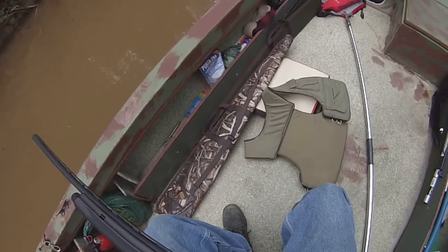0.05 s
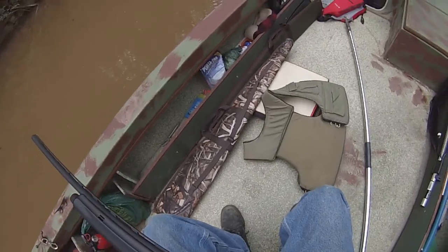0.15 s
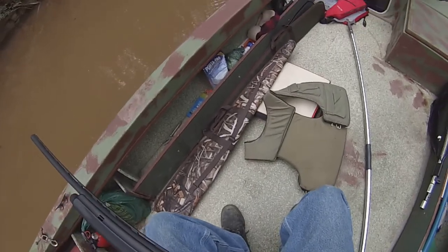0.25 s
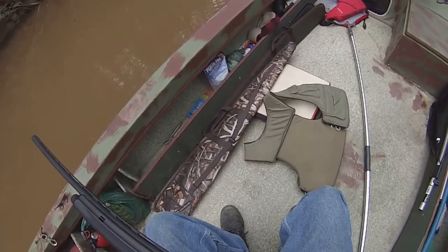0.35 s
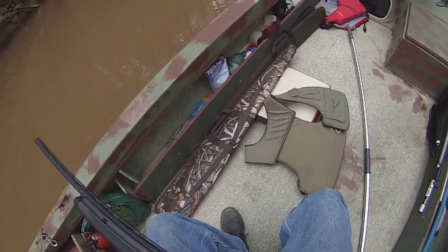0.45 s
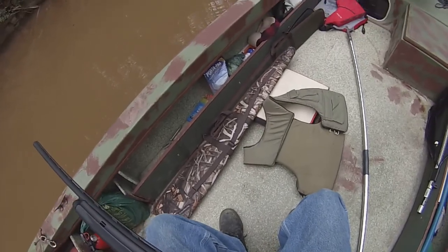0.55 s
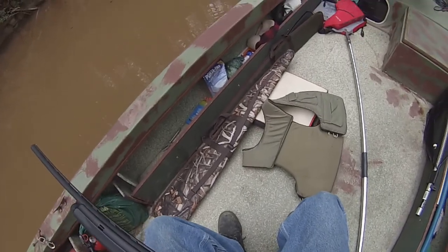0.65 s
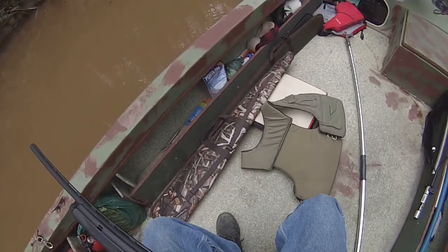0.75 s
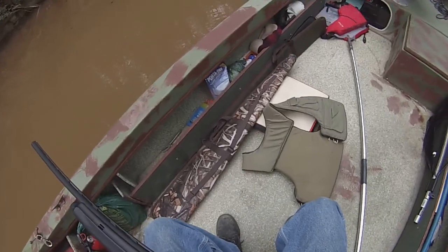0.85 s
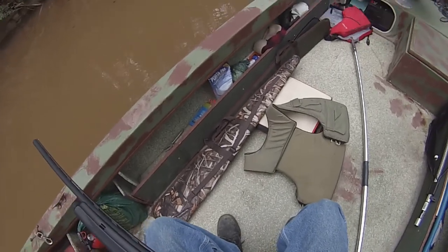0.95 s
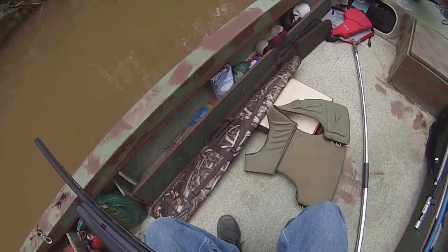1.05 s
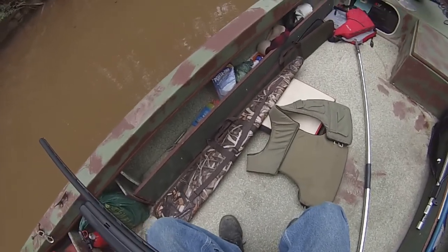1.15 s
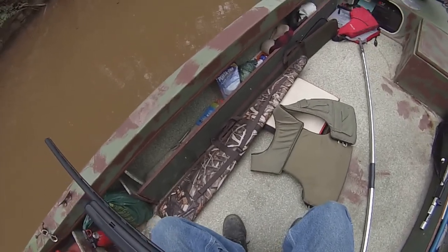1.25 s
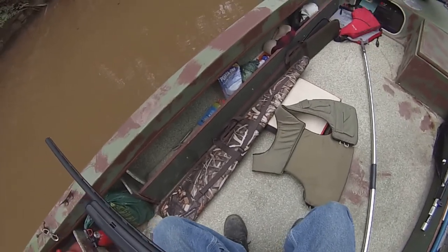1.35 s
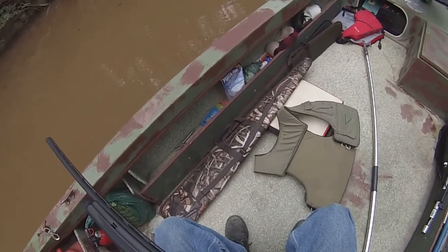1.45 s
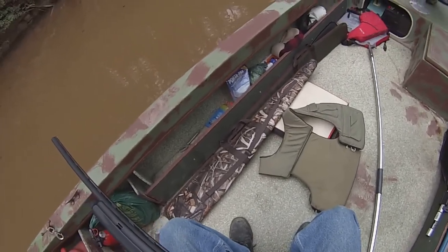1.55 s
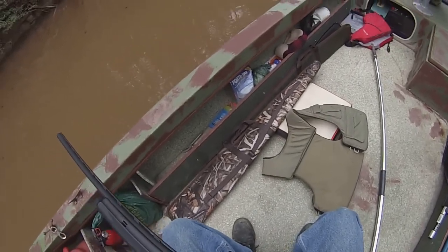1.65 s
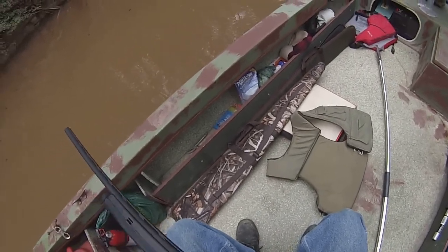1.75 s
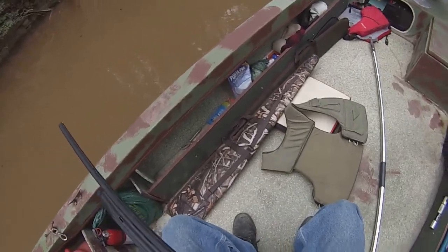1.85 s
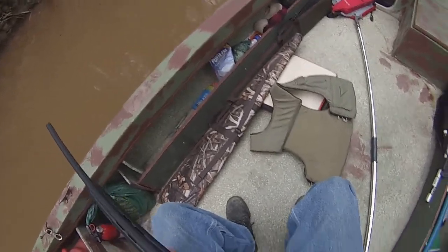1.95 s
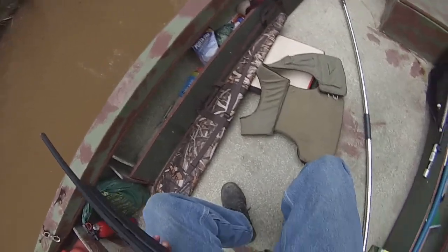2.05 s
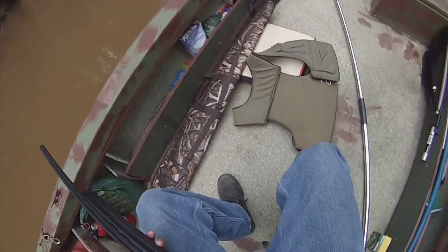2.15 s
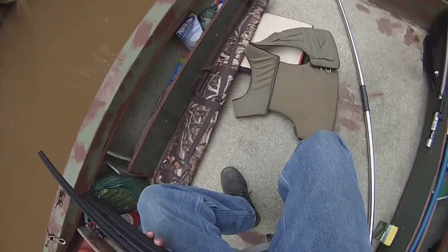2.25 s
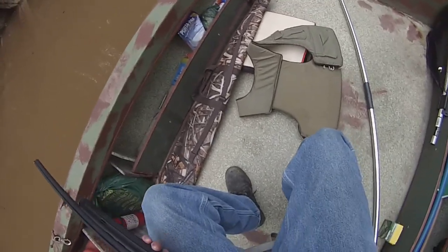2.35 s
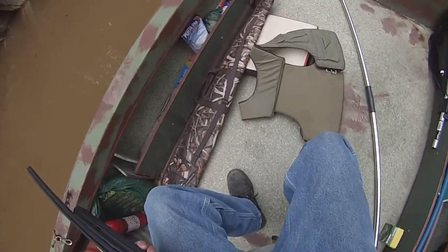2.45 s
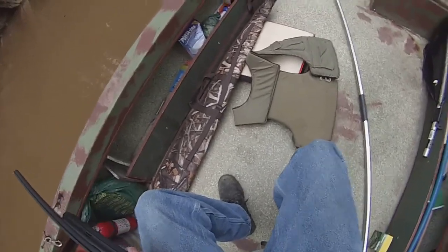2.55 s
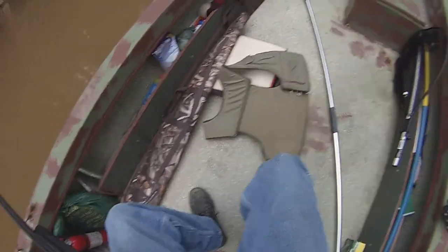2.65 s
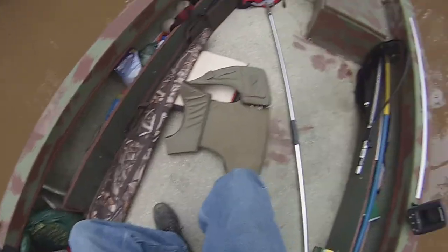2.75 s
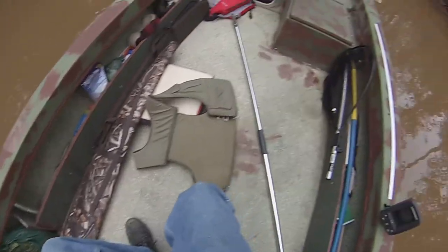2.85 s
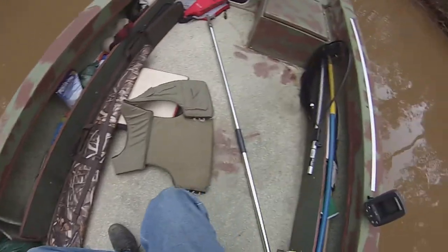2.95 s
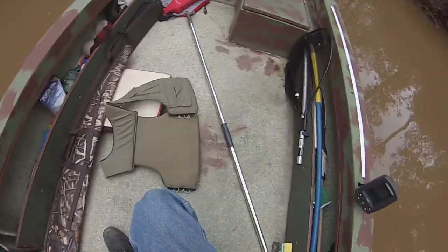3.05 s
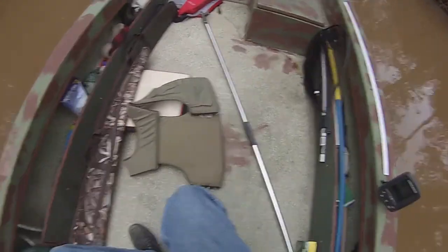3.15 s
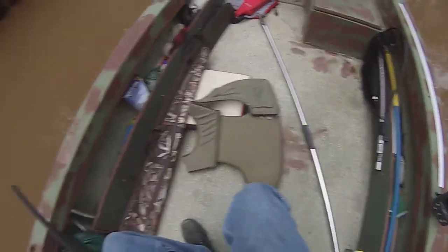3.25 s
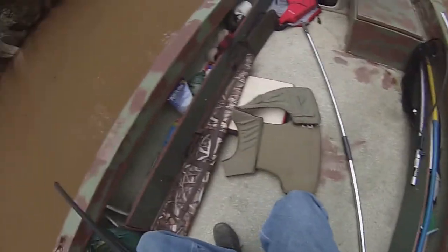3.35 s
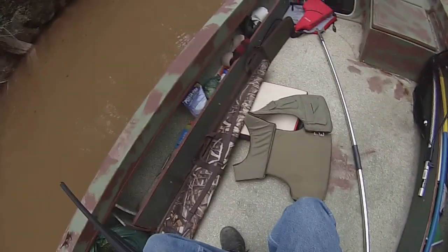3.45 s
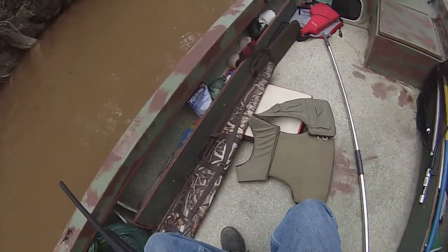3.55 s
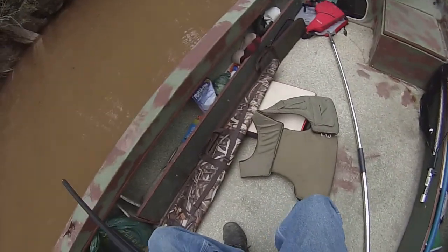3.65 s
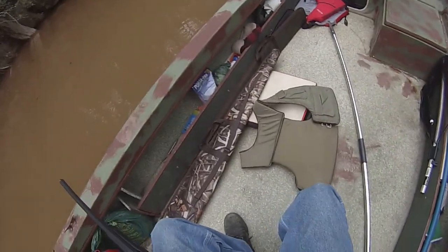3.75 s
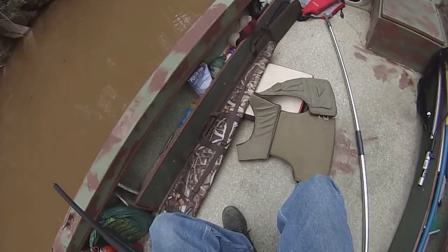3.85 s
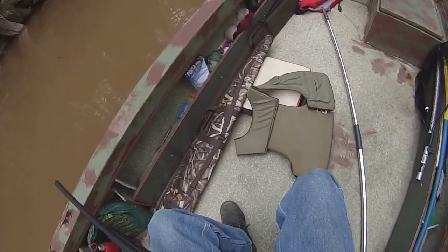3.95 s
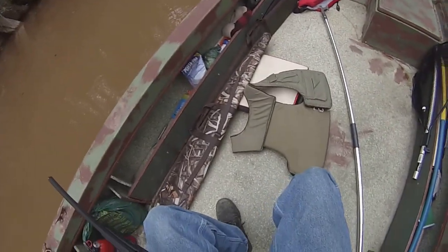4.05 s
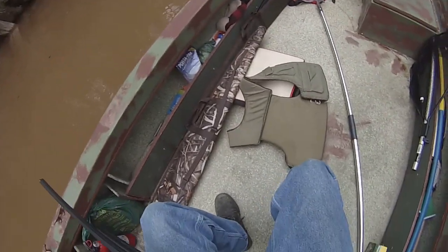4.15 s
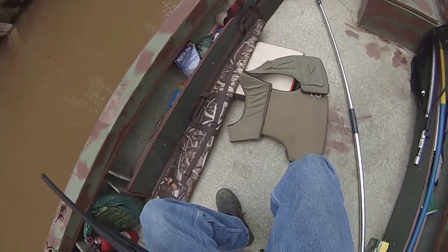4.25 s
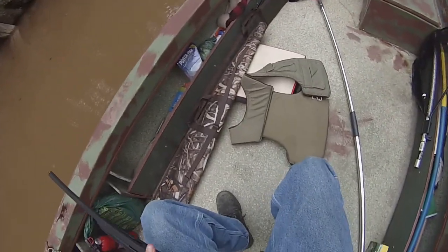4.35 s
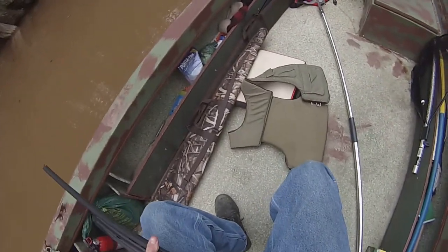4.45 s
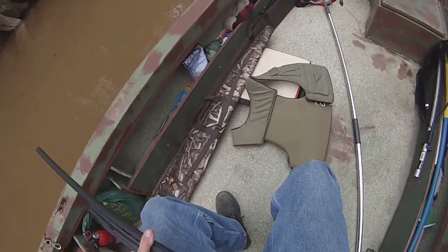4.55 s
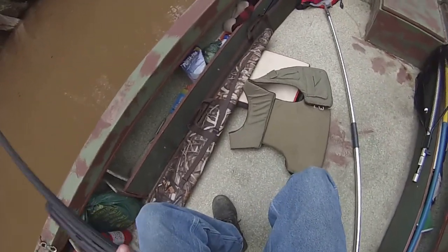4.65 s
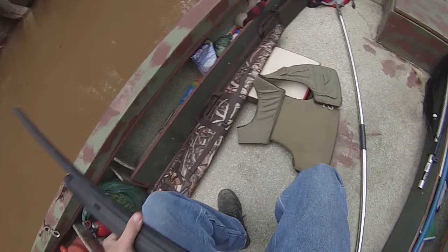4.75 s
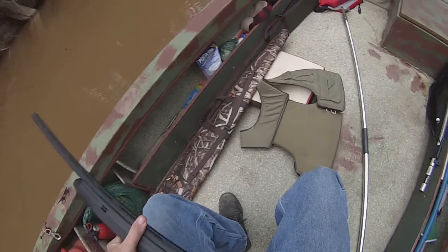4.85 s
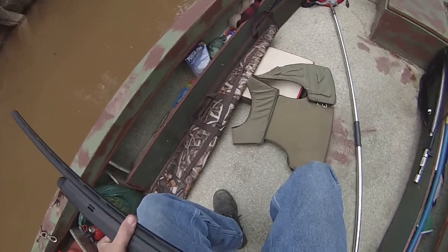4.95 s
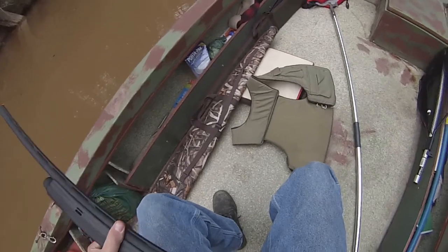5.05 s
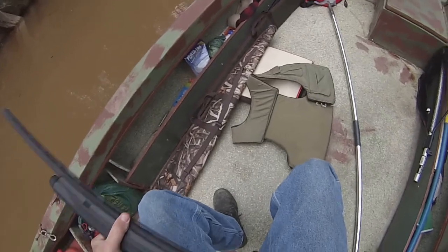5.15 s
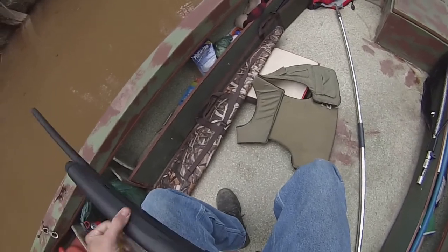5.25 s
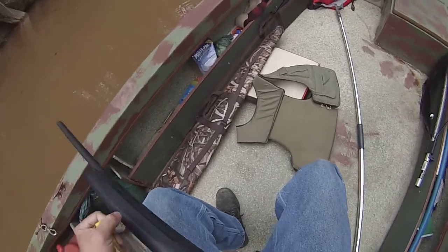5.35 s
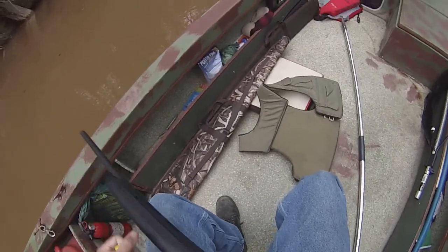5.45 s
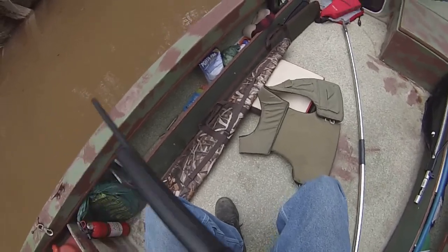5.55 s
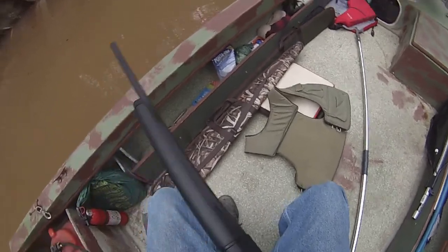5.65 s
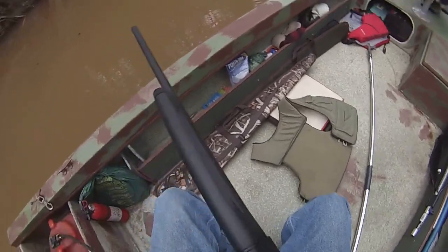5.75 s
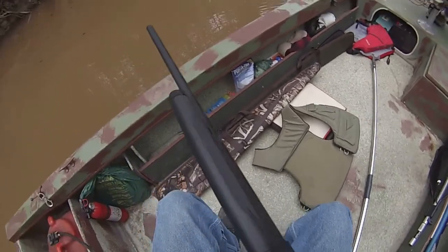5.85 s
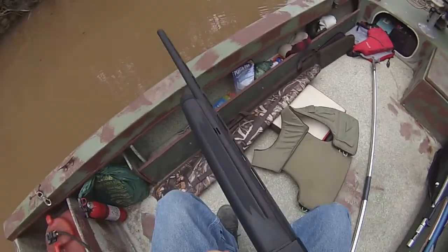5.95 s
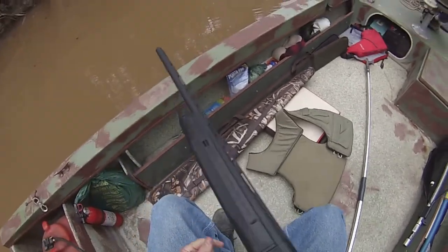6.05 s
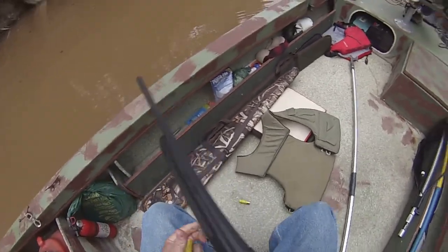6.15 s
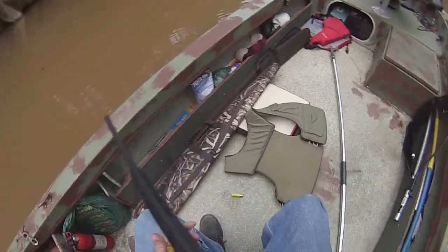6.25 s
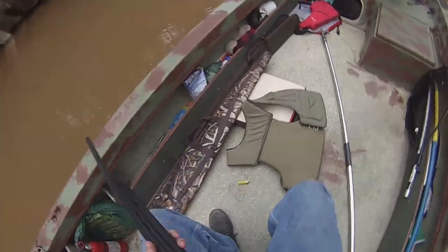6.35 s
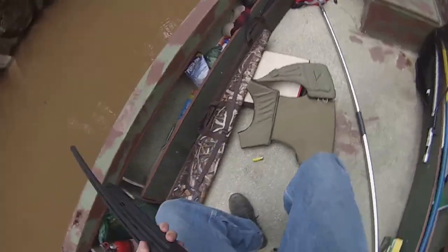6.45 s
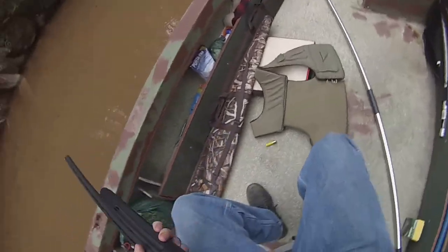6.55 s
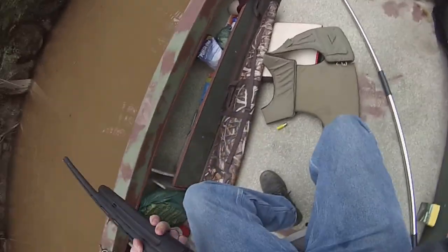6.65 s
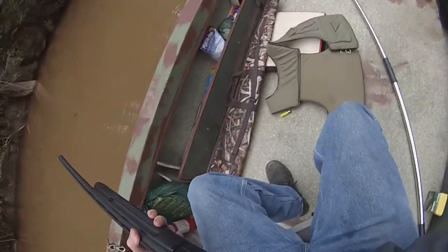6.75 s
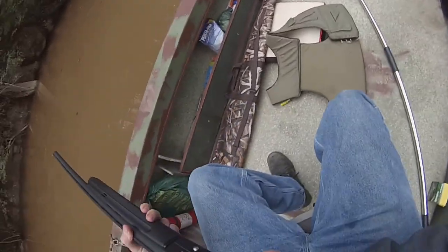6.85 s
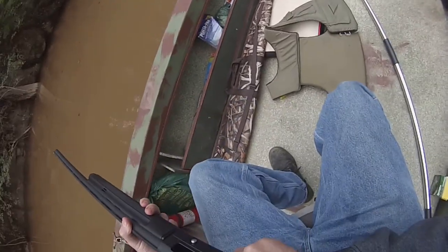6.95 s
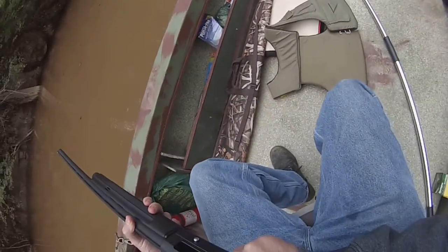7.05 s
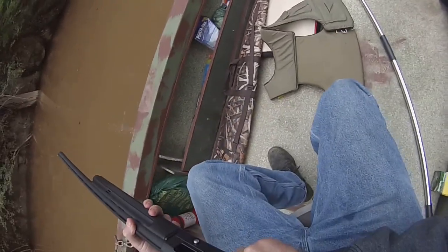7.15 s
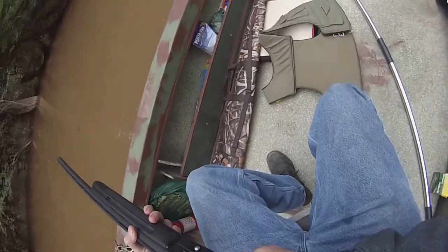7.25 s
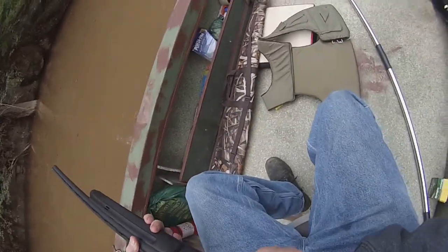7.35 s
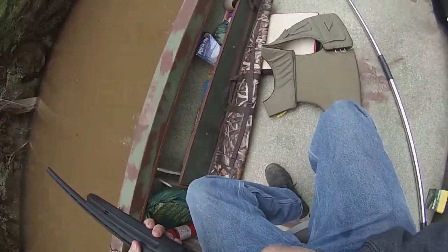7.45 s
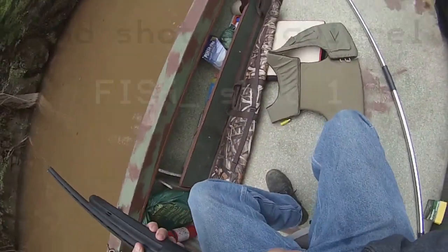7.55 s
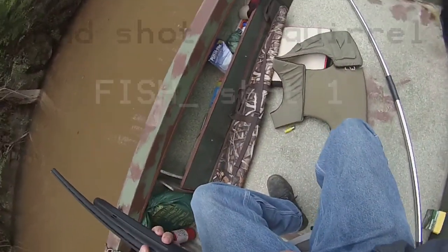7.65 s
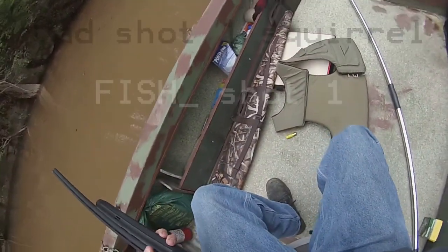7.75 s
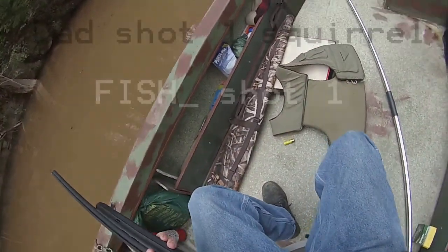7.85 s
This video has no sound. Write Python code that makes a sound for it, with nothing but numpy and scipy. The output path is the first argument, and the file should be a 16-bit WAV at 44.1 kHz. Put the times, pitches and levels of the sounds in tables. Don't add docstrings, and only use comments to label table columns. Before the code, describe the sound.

Close metallic clicks and hard racking clacks, quiet fumbling, then one loud hollow knock, a few bounces and gritty rolling on a boat floor.

```python
import sys
import numpy as np
from scipy import signal
from scipy.fft import rfft, irfft
from scipy.io import wavfile
from scipy.ndimage import uniform_filter1d

SR = 44100
rng = np.random.default_rng(int(sys.argv[2]) if len(sys.argv) > 2 else 0)


def ratio_of_db(decibels):
    return 10 ** (np.asarray(decibels, float) / 20)


def pcm_store(signal):
    levels = np.round(np.clip(np.atleast_2d(signal), -1, 1) * 32767)
    wavfile.write(sys.argv[1], SR, levels.astype(np.int16).T)


N = 347934
RING = 4096

# pitch_hz [Hz], level_db [dB], ring_s [s to fall 60 dB]
STEEL_MODES = [(1621, 19, 0.048), (1946, 10, 0.13), (2320, 6, 0.022), (2320, 4.5, 0.15), (2838, -7, 0.011),
               (3330, -19.5, .05), (4170, -4.5, 0.011), (4200, -14, 0.13), (5140, 3, 0.15),
               (5110, 1.5, 0.16), (6027, 3.5, 0.11), (6470, -12, .03)]
# pitch_hz [Hz], level_db [dB], ring_s [s to fall 60 dB]
STOCK_MODES = [(720, -5.5, 0.046), (800, 2.5, 0.013), (897, -8.5, 0.15), (1040, -5, 0.0062),
               (1140, 0.5, 0.024), (1356, 11, 0.017)]
# pitch_hz [Hz], level_db [dB], ring_s [s to fall 60 dB]
PLATE_MODES = [(200, 2, 0.66), (274, 2.5, 0.09), (314.5, -1.5, 0.033), (350, -5.5, 0.093), (411.8, 2, 0.09),
               (460, -1.5, 0.24), (561, -4.5, 0.15), (670.5, -21.5, 0.077)]


def colour(x, points):
    hz, db = np.transpose(points)
    size = x.shape[-1]
    bins = np.maximum(np.arange(size // 2 + 1) * SR / size, 1)
    gain = ratio_of_db(np.interp(np.log(bins), np.log(hz), db))
    y = irfft(rfft(x) * gain, size)
    return y / np.sqrt(np.mean(y ** 2))


def band(x, lo_hz, hi_hz):
    sos = signal.butter(2, [lo_hz, min(hi_hz, .45 * SR)], "bandpass", fs=SR, output="sos")
    return signal.sosfilt(sos, x)


def walk(rate):
    hold = int(SR / rate)
    steps = np.repeat(rng.standard_normal(N // hold + 1), hold)
    smooth = uniform_filter1d(uniform_filter1d(steps, hold), hold)[:N]
    return smooth / smooth.std()


def fade(t, t60):
    return np.exp(-np.log(1000) * t / t60)


def peak_one(rings):
    return rings / np.abs(rings).max(axis=1, keepdims=True)


def strike(modes, t60, centre_hz, octaves, scatter_db, crack_db, push_s, linger_db):
    hz, db, own_t60 = np.transpose(modes)
    t = np.arange(RING) / SR
    bins = (np.arange(RING // 2 + 1) + 1) * SR / RING
    chance = rng.standard_normal((len(t60), RING + 3 * len(hz)))
    noise = chance[:, :RING]
    spread, detune, phase = np.split(chance[:, RING:], 3, axis=1)

    gain = ratio_of_db(db + scatter_db * spread - 6 * (np.log2(hz / centre_hz[:, None]) / octaves) ** 2)
    pole = 2j * np.pi * hz * (1 + .008 * detune) - np.log(1000) / own_t60
    ring = sum(gain[:, [k]] * np.exp(pole[:, [k]] * t + .6j * phase[:, [k]]).imag for k in range(len(hz)))

    tilt = ratio_of_db(-6 * (np.log2(bins / centre_hz[:, None]) / octaves) ** 2)
    crack = irfft(rfft(noise) * tilt, RING) * fade(t, own_t60.mean())
    both = peak_one(ring) + ratio_of_db(crack_db) * peak_one(crack)

    both = both * (fade(t, t60[:, None]) + ratio_of_db(linger_db))
    snap_db, snap_s = 2, .0004
    both = both * (1 + ratio_of_db(snap_db) * np.exp(-t / snap_s))
    both = both * (1 - np.exp(-t / push_s)) * np.cos(np.pi / 2 * t / t[-1])
    return peak_one(both)


def place(times, rings):
    out = np.zeros(N + RING)
    for s, ring in zip(times, rings):
        start = int(s * SR)
        out[start:start + RING] += ring
    return out[:N]


def resonate(x, modes, widen):
    y = 0
    for hz, db, t60 in modes:
        b, a = signal.iirpeak(hz, hz * t60 / (4.7 * widen), SR)
        y = y + ratio_of_db(db) * signal.lfilter(b, a, x)
    return y / y.std()


def swells(peak_s, rise_s, fall_s, db):
    hop, fade_db = 50, -26
    t = np.arange(0, N + hop, hop) / SR
    power = 0
    for s, rise, fall, d in zip(peak_s, rise_s, fall_s, db):
        stroke_db = np.interp(t, [s - rise, s, s + fall], [d + fade_db, d, d + fade_db], left=-200, right=-200)
        power = power + ratio_of_db(stroke_db) ** 2
    return uniform_filter1d(np.repeat(np.sqrt(power), hop)[:N], size=200)


def air():
    # pitch_hz [Hz], level_db [dB per Hz]
    water = [(12, -32.5), (20, 0), (184, -7.5), (451, -16.5), (534, -9.5), (614, -18), (813, -18),
             (1170, -21), (2230, -24), (13500, -41), (16400, -54)]
    # pitch_hz [Hz], level_db [dB rms]
    motor = [(177.6, -69.5), (532.9, -79)]
    t = np.arange(N) / SR
    level = ratio_of_db(-57.5 + .3 * walk(1.5) + .7 * walk(12))
    bed = level * colour(rng.standard_normal(N), water)
    hum = sum(np.sqrt(2) * ratio_of_db(db + 0.76 * walk(1.7)) * np.sin(2 * np.pi * hz * t) for hz, db in motor)
    return bed + hum


def slides():
    # loudest_s [s], rise_s [s], fall_s [s], level_db [dB], stock_minus_level_db [dB]
    strokes = [(.06, 0.12, .06, -58.5, -1), (.295, 0.03, 0.011, -52.5, 1), (.56, 0.036, 0.098, -62.5, 5),
               (0.599, 0.02, 0.011, -36.5, -2), (0.981, 0.01, .025, -44.5, 1), (.7, 0.19, 0.079, -57, -10),
               (1.84, 0.021, 0.19, -66, 2), (2.313, 0.022, 0.0085, -44, -3), (2.6, 0.064, 0.06, -40.5, -3),
               (2.831, 0.048, 0.063, -37, 4.5), (3.76, 0.47, .05, -66, 4.5), (3.806, .01, .05, -44, -5.5),
               (3.908, .01, .07, -42.5, -3.5), (2.862, .01, .08, -40.5, 0), (3.03, 0.22, .4, -68.5, -8.5),
               (3.87, 0.14, 0.14, -50.5, 2), (3.971, 0.086, 0.13, -43, -9), (4.39, .04, .04, -60.5, -1),
               (4.779, 0.078, 0.031, -50.5, 7), (4.86, 0.12, 0.11, -63.5, 17),
               (4.97, 0.08, 0.059, -65, -10), (5.07, 0.044, 0.068, -63, 6), (5.201, 0.22, 0.093, -67.5, 6),
               (5.3, .12, 0.14, -53.5, 1), (5.5, .2, 0.11, -81.5, 14)]
    # pitch_hz [Hz], level_db [dB per Hz]
    rasp = [(710, -30.5), (1200, -10), (1570, -7), (1810, 1), (3870, -3.5), (5350, -3), (7330, -19),
            (14700, -18.5), (16000, -33.5)]
    slips = rng.standard_normal(N) * ratio_of_db(3.5 * walk(250)) * ratio_of_db(1.5 * walk(40))
    steel = colour(slips, rasp) + 0.34 * resonate(slips, STEEL_MODES, widen=3.0)
    stock = band(resonate(slips, STOCK_MODES, widen=1.2), 700, 1150)
    s, rise, fall, db, stock_db = np.transpose(strokes)
    steel = swells(s, rise, fall, db) * steel / steel.std()
    return steel + swells(s, rise, fall, db + stock_db) * stock / stock.std()


def clicks():
    # start_s [s], level_db [dB peak], pitch_hz [Hz, centre], pins_minus_level_db [dB]
    ticks = [(0.0323, -40.5, 1940, -12), (0.095, -30, 2950, -22), (0.2351, -26, 4200, -8),
             (0.4961, -28.5, 3670, -9), (0.5934, -27, 4070, -6), (0.6015, -22, 2960, -14),
             (0.631, -34, 3520, -3), (0.7644, -33.5, 3130, -2.5), (0.8029, -27.5, 3780, -10.5),
             (0.9836, -30.5, 2530, -12), (1.0512, -22, 3940, -13), (1.165, -31, 3800, -15),
             (1.3037, -28, 3230, -18), (1.3099, -31.5, 3480, -25), (1.4005, -24.5, 3200, -28),
             (1.836, -33.5, 2320, -24), (2.0524, -37, 2850, -9), (2.0644, -29.5, 2740, -13),
             (2.1527, -33.5, 2220, -12), (2.3137, -20.5, 2820, -15.5)]
    slams = [(2.558, -25, 3640, -11), (2.5652, -14, 3440, -10), (2.569, -12, 3630, -11),
             (2.5757, -13, 3650, -18.5), (2.5954, -9.5, 4630, -18.5), (2.6047, -16.5, 4500, -16.5),
             (2.6384, -29, 4000, -18), (2.6427, -22, 3590, -23), (2.6982, -42.5, 2780, -19.5),
             (2.8156, -11.5, 2230, -13), (2.83, -12, 2110, -16), (2.855, -3.5, 3100, -10.5),
             (2.869, -30.5, 3360, -17), (2.8835, -18.5, 2110, -9), (3.8, -21, 3200, -4.5),
             (3.8478, -21.5, 3620, -15.5), (3.866, -12.5, 4000, -21), (3.902, -13.5, 2830, -8.5),
             (3.926, -31, 2250, -13), (3.9365, -11, 4240, -5.5), (3.9397, -1, 3920, -4),
             (3.985, -37, 3900, -15), (3.9963, -31.5, 2860, -5), (4.006, -37, 2140, -30),
             (4.1753, -30.5, 3490, -15), (4.3635, -21, 3330, -20.5), (4.3835, -14.5, 2650, -13.5),
             (4.398, -28.5, 3770, -17)]
    fumbles = [(4.7296, -32, 2640, -34), (4.7728, -28, 3160, -11), (4.783, -33.5, 2150, -30),
               (4.8153, -28, 3220, -26), (4.8255, -32, 3040, -35), (4.846, -29.5, 2420, -29),
               (4.873, -28.5, 3150, -37), (4.95, -36, 2690, -35), (4.9926, -35.5, 3280, -26),
               (5.001, -27, 2920, -20), (5.0497, -32, 2520, -36), (5.0692, -37.5, 3060, -30),
               (5.1878, -40.5, 2370, -24), (5.3098, -29.5, 2070, -16), (5.3276, -21, 3540, -10.5),
               (5.355, -24, 3240, -20), (5.362, -23, 4750, -19.5), (5.417, -20, 4040, -12),
               (5.4275, -30.5, 3440, -12), (5.47, -33.5, 3920, -29.5), (5.5062, -29.5, 3340, -31),
               (5.7286, -42.5, 4610, -15)]
    rattles = [(0.0546, -41, 2500, -8), (.2824, -46.5, 2500, -15), (0.564, -50, 3000, -17),
               (1.0196, -42, 3000, -15), (1.089, -41, 2510, -15), (1.2649, -46, 1800, -25),
               (1.6894, -51, 3000, -25), (1.86, -45, 3000, -27), (1.9075, -46.5, 3000, -20),
               (2.2634, -45.5, 2500, -20), (2.3701, -49.5, 2500, -20), (2.5458, -34.5, 2470, -9),
               (2.5538, -30, 3200, -20), (2.581, -21, 4500, -13), (2.6012, -22, 4800, -18),
               (2.632, -44, 5000, -8), (2.653, -33, 4520, -25), (2.796, -35.5, 4450, -12),
               (2.804, -30, 3950, -18), (4.3528, -33, 4800, -22), (4.3575, -31, 4970, -20.5),
               (4.3743, -24.5, 2500, -16), (4.7005, -48, 2200, -23), (4.7164, -35, 2800, -24),
               (4.7772, -33, 2500, -20), (4.835, -37, 3500, -20), (4.859, -40, 3500, -25),
               (4.8927, -35.5, 3500, -26), (4.936, -53, 3000, -15), (4.9818, -39, 3480, -21),
               (5.062, -37.5, 2990, -25.5), (5.179, -50, 5000, -12), (5.2149, -56, 3960, -22),
               (5.2898, -41.5, 3500, -17), (5.446, -42, 4970, -18), (5.492, -43, 4480, -11.5),
               (5.502, -33, 3510, -25), (5.512, -43, 4800, -23.5)]
    # pitch_hz [Hz], level_db [dB], ring_s [s to fall 60 dB]
    pin_modes = [(6960, 14.5, 0.0091), (9400, 8, 0.017), (13130, 0, 0.086)]
    stock_levels = (-12, -9.5, -10, -11.5, -8.5)

    kinds = [ticks, slams, fumbles, rattles, chatter()]
    s, db, hz, pins_db = np.concatenate(kinds).T
    stock_db = np.repeat(stock_levels, [len(kind) for kind in kinds]) - 13 * np.log2(hz / 3000)
    t60 = 0.019 * ratio_of_db(0.15 * (db + 29.5))
    steel = strike(STEEL_MODES, t60, hz, octaves=.8, scatter_db=4, crack_db=4, push_s=0.00017, linger_db=-28)
    pins = strike(pin_modes, 0.84 * t60, 0 * hz + 9800, octaves=1.0, scatter_db=-7.5, crack_db=8,
                  push_s=0.00063, linger_db=-14.0)
    stock = strike(STOCK_MODES, 1.8 * t60, 0 * hz + 950, octaves=.45, scatter_db=5, crack_db=-6,
                   push_s=.0005, linger_db=-11)
    both = steel + ratio_of_db(pins_db)[:, None] * pins + ratio_of_db(stock_db)[:, None] * stock
    return place(s, ratio_of_db(db)[:, None] * both)


def knocks():
    # start_s [s], level_db [dB peak], pitch_hz [Hz, centre], ring_s [s to fall 60 dB]
    blows = [(0.285, -44.5, 540, 0.099), (1.068, -36.5, 650, 0.048), (1.097, -37.5, 720, 0.032),
             (1.262, -40.5, 560, 0.042), (1.339, -47.5, 656, 0.06), (1.415, -41, 288, 0.053),
             (1.465, -41.5, 720, 0.027), (1.694, -48.5, 786, 0.054), (1.861, -46.5, 694, 0.07),
             (2.15, -32, 950, 0.043), (2.235, -44, 475, 0.06), (2.568, -31, 410, 0.085),
             (2.596, -34, 423, 0.032), (2.817, -33, 534, 0.014), (2.855, -24, 443, 0.023),
             (3.94, -14.5, 800, 0.031), (4.005, -38, 460, 0.081), (4.959, -36, 958, 0.04),
             (5.147, -44, 855, 0.054), (5.308, -23, 860, 0.049), (5.333, -34.5, 575, 0.06),
             (5.572, -28.5, 480, 0.049), (5.628, -37.5, 612, 0.05), (5.934, 0, 408, 0.072),
             (6.072, -11.5, 326, 0.094), (6.133, -8, 350, 0.45), (5.941, -6, 730, 0.067),
             (6.321, -19, 910, 0.029), (7.058, -29, 331, 0.039), (3.801, -43, 450, 0.037),
             (3.848, -29.5, 800, .03), (4.365, -34.5, 777, .04), (4.385, -38, 780, 0.042),
             (4.732, -30.5, 850, 0.032), (4.776, -36, 940, .04), (4.785, -37, 880, .04),
             (5.355, -30, 900, 0.036)]
    # start_s [s], level_db [dB peak], pitch_hz [Hz], ring_s [s to fall 60 dB]
    thumps = [
        (1.075, -33, 86, 0.13),
        (1.136, -39, 68, 0.076),
        (1.266, -37.5, 95, 0.077),
        (1.416, -33, 192, 0.26),
        (1.451, -41, 99.6, 0.1),
        (1.481, -37.5, 133, 0.14),
        (5.937, -19.5, 150, 0.29),
        (6.133, -42, 200, 0.12),
    ]
    # pitch_hz [Hz], level_db [dB], ring_s [s to fall 60 dB]
    keel_modes = [(68.5, 4.5, 0.31), (100.7, -2, 0.12), (150, -3.5, 0.069)]
    s, db, hz, t60 = np.transpose(blows)
    plates = strike(PLATE_MODES + STOCK_MODES[:4], t60, hz, octaves=.56, scatter_db=3, crack_db=-5,
                    push_s=.0008, linger_db=-11)
    out = band(place(s, ratio_of_db(db)[:, None] * plates), 184.5, 5500)
    s, db, hz, t60 = np.transpose(thumps)
    keel = strike(keel_modes, t60, hz, octaves=0.88, scatter_db=-14.0, crack_db=-3.0,
                  push_s=0.0072, linger_db=-15.0)
    return out + place(s, ratio_of_db(db)[:, None] * keel)


def chatter():
    # [Hz, centre]
    runs = [
        (.612, 0.024, -45, 2480),
        (2.571, 0.024, -26, 4000),
        (3.869, 0.016, -31.5, 4000),
        (3.908, 0.013, -38, 2900),
        (4.756, 0.016, -46, 3000),
        (5.26, 0.045, -50, 2980),
        (3.945, 0.019, -25, 4000),
    ]
    count = 4
    s, length, db, hz = np.repeat(runs, count, axis=0).T
    slot = np.arange(len(s)) % count
    size, tone, top = rng.standard_normal((len(s), 3)).T
    when = s + length * (slot + rng.random(len(s))) / count
    return np.transpose([when, db + 8.5 * size, hz * 2 ** (0.066 * tone), -23.5 + 4 * top])


def shuffles():
    # loudest_s [s], rise_s [s], fall_s [s], level_db [dB]
    strokes = [
        (1.12, 0.093, 0.12, -58.5),
        (1.46, 0.033, 0.15, -53.5),
        (5.969, 0.02, 0.23, -35.5),
        (6.169, 0.067, 0.18, -26.5),
        (6.42, 0.53, 0.63, -34),
        (6.62, 0.36, 0.47, -40.5),
        (6.9, 0.37, 0.33, -48.5),
        (7.09, 0.24, 0.11, -51),
        (7.56, 0.29, 0.64, -52),
        (7.86, 0.55, 0.37, -50.5),
    ]
    # pitch_hz [Hz], level_db [dB per Hz]
    rumble = [(59, -47), (100, -17), (252, 3), (321, -16.5), (414, -4), (536, -16.5), (755, -11.5),
              (1240, -27), (6000, -61), (7800, -68), (13200, -120)]
    hiss = rng.standard_normal(N)
    bumps = walk(45)
    grit = hiss * ratio_of_db(1.5 * bumps)
    plates = band(resonate(grit, PLATE_MODES, widen=8.1), 182, 514)
    both = colour(grit, rumble) + .5 * plates / plates.std()
    speed = swells(*np.transpose(strokes))
    rough = colour(grit * ratio_of_db(2 * bumps), [(300, -23), (600, 5.5), (1500, -4), (3000, -13), (8000, -35)])
    grate = ratio_of_db(-48) * (speed / ratio_of_db(-32)) ** (1 + 0.49) * rough
    return speed * both / both.std() + grate


def pings():
    # start_s [s], level_db [dB peak],
    # pitch_hz [Hz], ring_s [s to fall 60 dB]
    single_notes = [(2.856, -43, 11220, .2), (3.8, -23, 9750, .03), (3.873, -28, 10500, .012),
                    (3.94, -30, 9530, .25), (3.94, -33, 9670, .2), (3.94, -36, 12700, .04),
                    (3.94, -11, 5400, .022), (3.9395, -15, 6200, .02), (3.941, -11, 1600, .016),
                    (4.733, -44, 5750, .018), (6.3205, -15, 900, .045), (2.8155, -21, 760, .05),
                    (2.816, -19, 2550, .03),
                    (2.151, -31, 1144, 0.052), (2.151, -32, 770, 0.053), (2.831, -23.5, 900, .05),
              (2.856, -19.5, 1335, 0.047), (4.776, -36, 930, .08), (4.785, -33.5, 867, 0.072),
              (4.81, -44, 1050, .12), (4.96, -34, 944, .04), (5.938, -14, 728, .12),
              (5.937, -18.5, 1700, 0.046), (6.722, -42, 2390, .03), (6.93, -50, 2444, .03)]
    s, db, hz, t60 = np.transpose(single_notes)[:, :, None]
    t = np.arange(RING) / SR
    held = np.clip((.045 - t) / .005, 0, 1)
    return place(s[:, 0], ratio_of_db(db) * np.sin(2 * np.pi * hz * t) * fade(t, t60) * held)


def bounces():
    # [Hz, centre]
    hits = [(5.9355, -1, 1100), (5.9374, -8, 990), (6.073, -18.5, 950), (6.1354, -22, 1000),
            (6.1402, -14.5, 1300), (6.1765, -45, 2040), (6.2068, -42, 3050), (6.2335, -40.5, 2930),
            (6.319, -31.5, 2560), (6.355, -38.5, 2760), (6.473, -44.5, 1970), (6.494, -38, 2110),
            (6.5398, -38.5, 2370), (6.7211, -39, 2320), (6.729, -37, 1880), (6.849, -42.5, 2920),
            (6.93, -45, 2410), (7.056, -51, 1300)]
    # pitch_hz [Hz], level_db [dB], ring_s [s to fall 60 dB]
    floor_modes = [(635, -20, 0.16), (700, -10, 0.062), (985, 4, 0.064), (1270, -4, 0.081),
                   (1280, -17, 0.09), (1540, -4.5, 0.09), (1650, 1.5, 0.07), (1780, -5, 0.065),
                   (2330, -19, 0.086), (2470, -5, 0.073), (2900, -36, 0.081), (3680, -14, 0.061)]
    s, db, hz = np.transpose(hits)
    t = np.arange(RING) / SR
    t60 = .035 * ratio_of_db(0.11 * (db + 20))
    rings = strike(floor_modes, t60, hz, octaves=1.2, scatter_db=4, crack_db=5, push_s=.0002, linger_db=-24)
    rim_hz, rim_s = 4200, .00011
    rim_gain = ratio_of_db(-1.5 + .3 * db)[:, None]
    tick = rim_gain * np.cos(2 * np.pi * rim_hz * t) * np.exp(-t / rim_s)
    return place(s, ratio_of_db(db)[:, None] * (rings + tick))


def tail(t60, delay_s, hi_hz):
    t = np.arange(int(t60 * SR)) / SR
    echo = band(rng.standard_normal(SR)[:len(t)], 340, hi_hz) * fade(t, t60) * (t > delay_s)
    return echo / np.sqrt(np.sum(echo ** 2))


def scene():
    contacts = band(clicks() + bounces(), 180, 19000) + knocks() + slides()
    near = signal.sosfilt(signal.butter(2, 45, "highpass", fs=SR, output="sos"), contacts)
    sides = signal.fftconvolve(near, tail(t60=0.054, delay_s=0.0033, hi_hz=11080))[:N]
    banks = signal.fftconvolve(near, tail(t60=.42, delay_s=.03, hi_hz=11000))[:N]
    echoed = near + ratio_of_db(-13) * sides + ratio_of_db(-32.5) * banks
    return (echoed + band(pings(), 300, 19000) + shuffles() + air())[None]


def roll_off(x):
    return signal.sosfilt(signal.butter(12, 16550, fs=SR, output="sos"), x)


def record(dry):
    top = signal.butter(12, 15300, fs=SR, output="sos")
    mix = signal.sosfilt(top, 0.94 * np.tanh(dry / 0.84))
    return roll_off(mix)


dry = scene()
out = record(dry)
pcm_store(out)
```